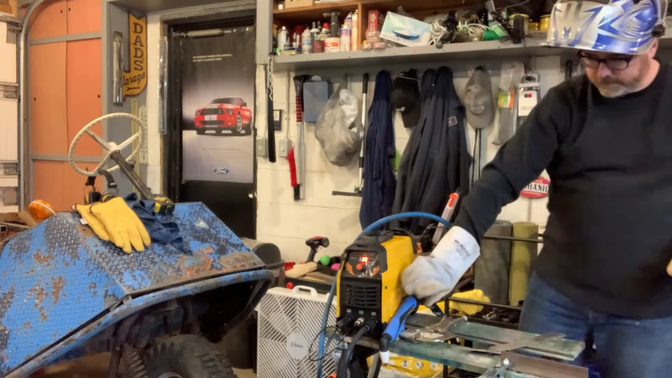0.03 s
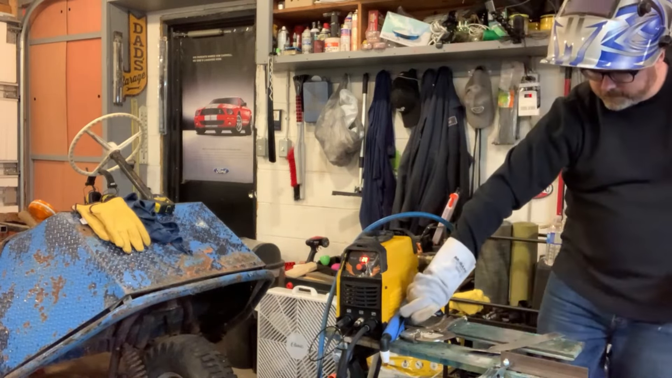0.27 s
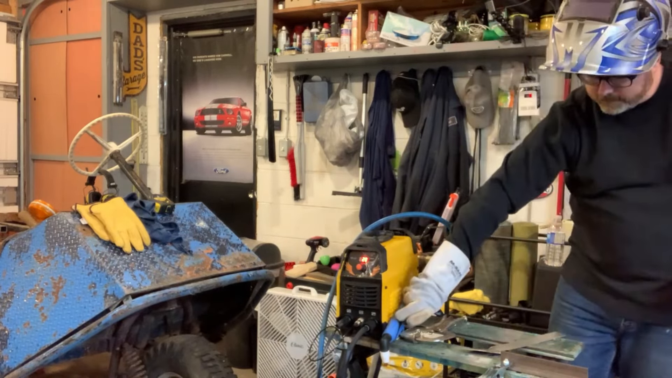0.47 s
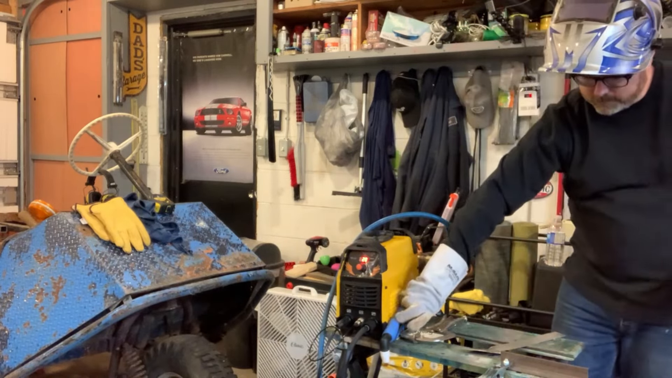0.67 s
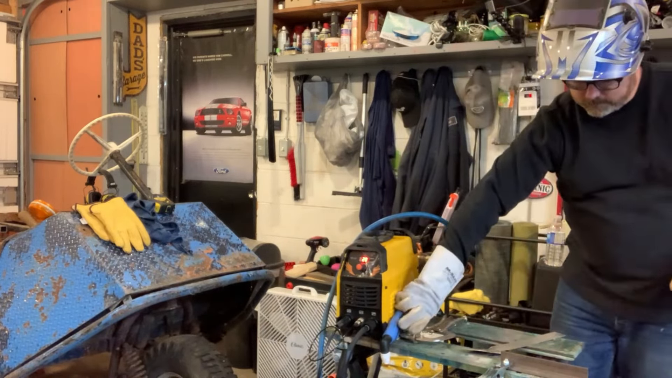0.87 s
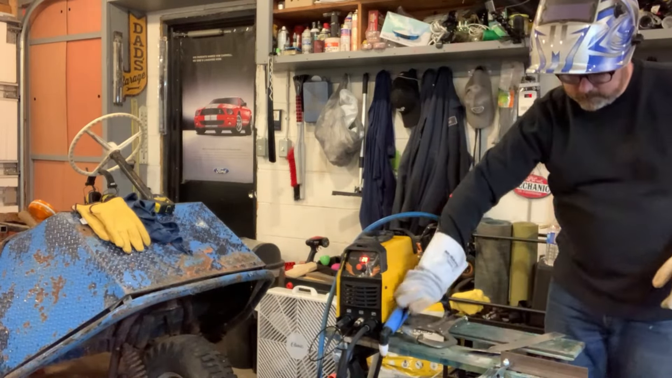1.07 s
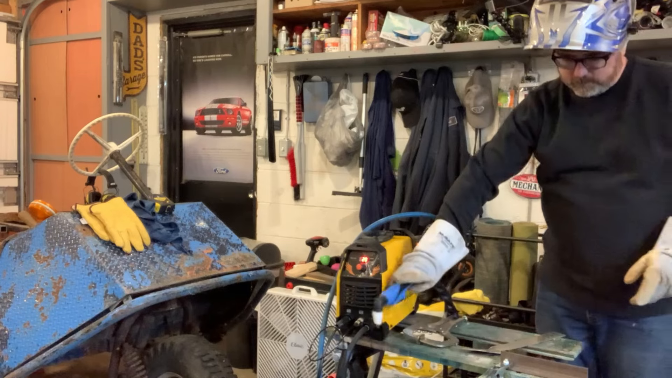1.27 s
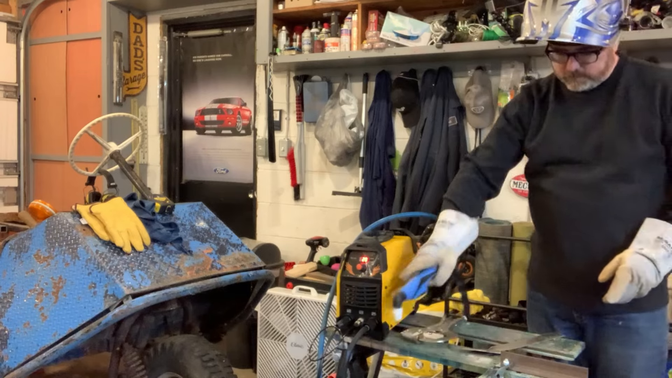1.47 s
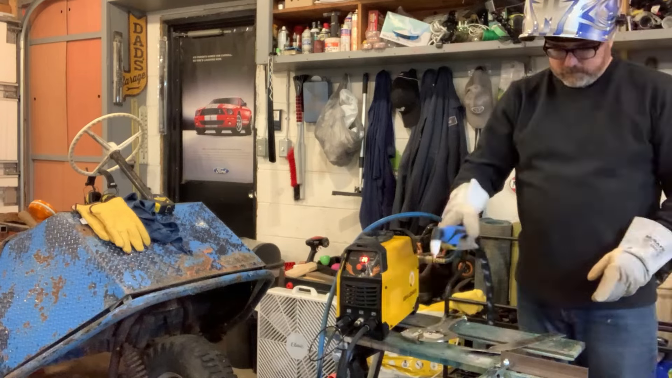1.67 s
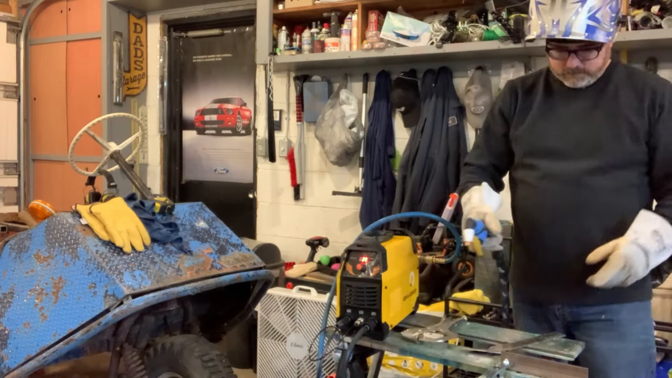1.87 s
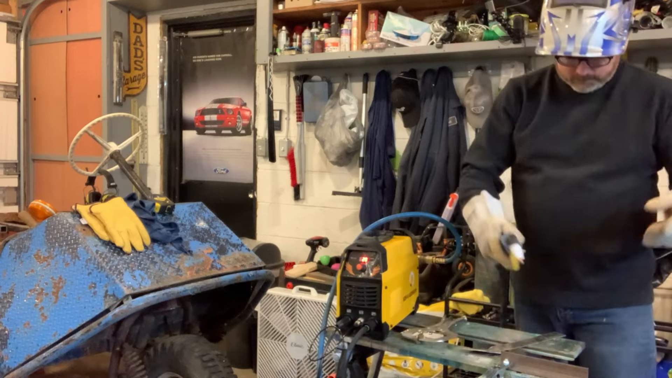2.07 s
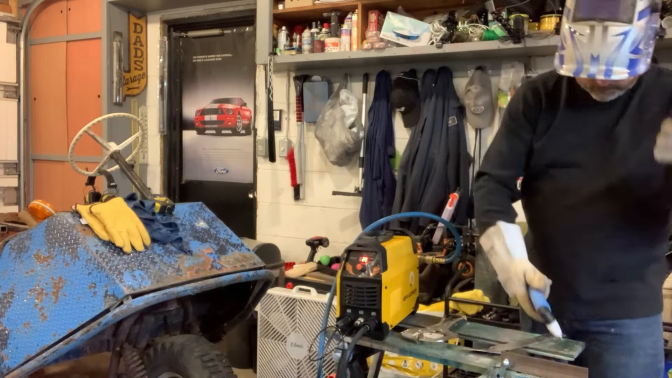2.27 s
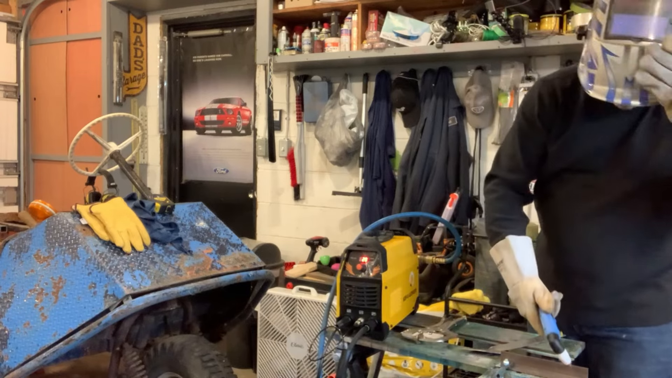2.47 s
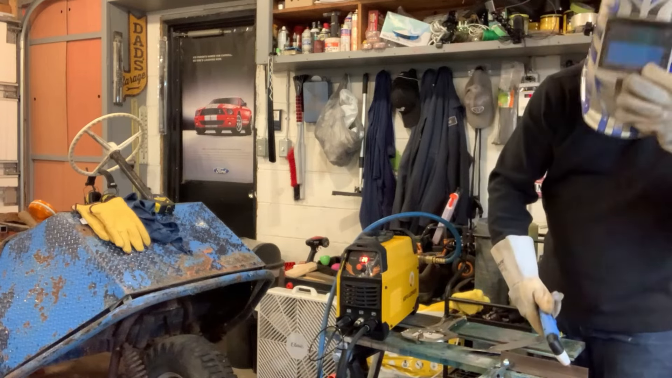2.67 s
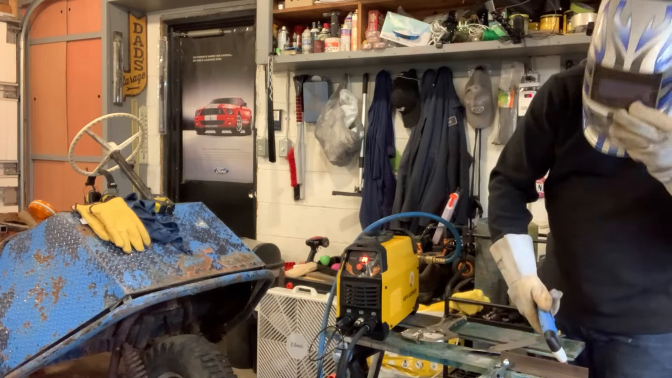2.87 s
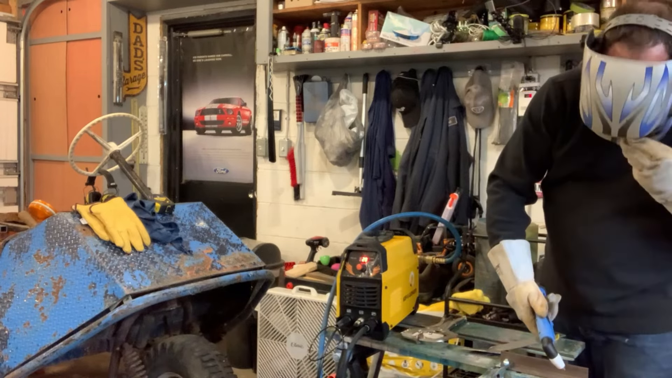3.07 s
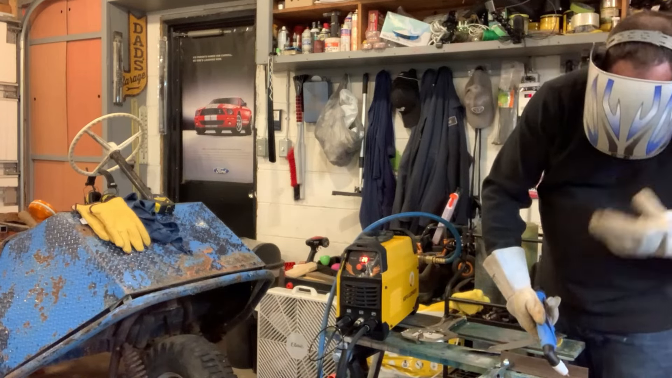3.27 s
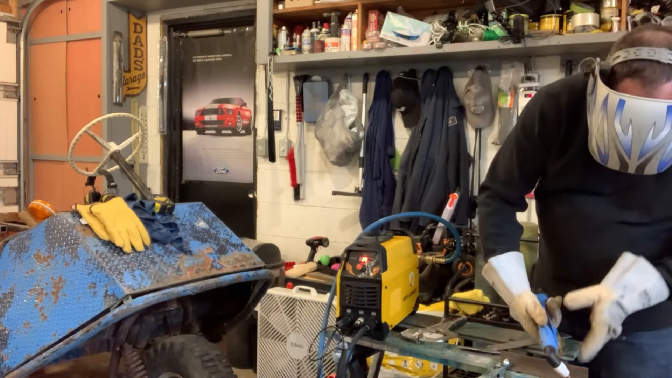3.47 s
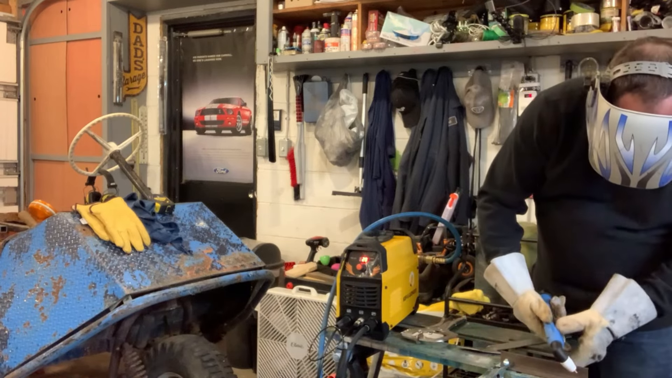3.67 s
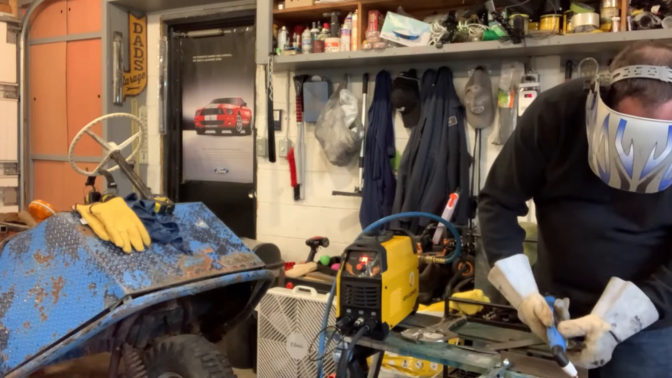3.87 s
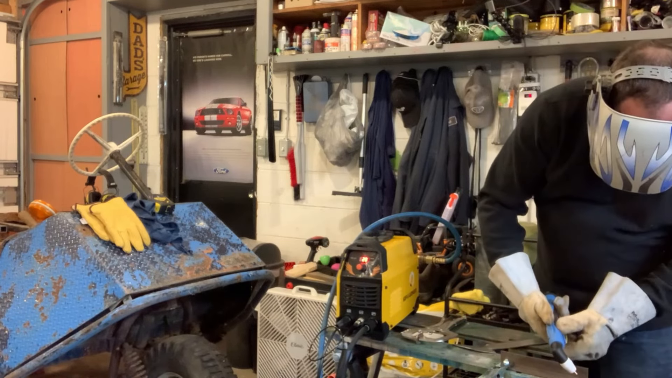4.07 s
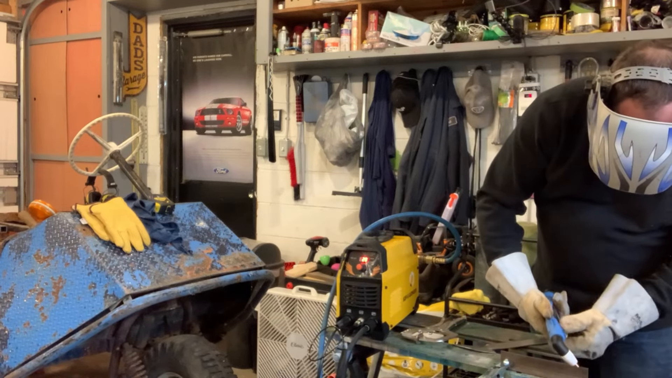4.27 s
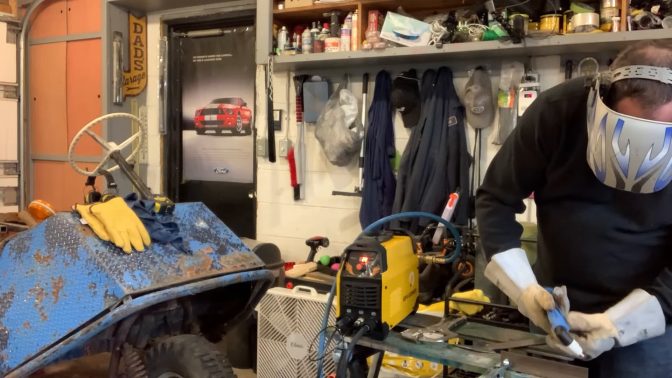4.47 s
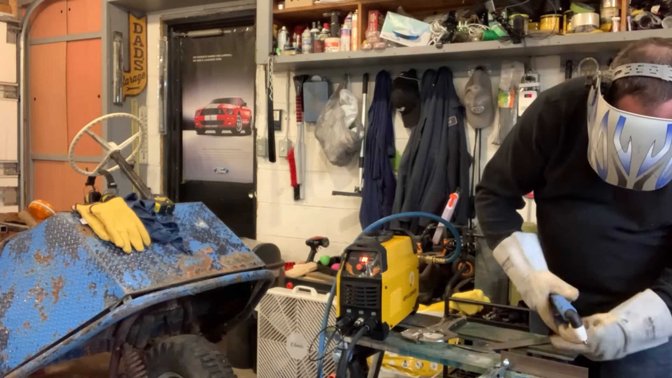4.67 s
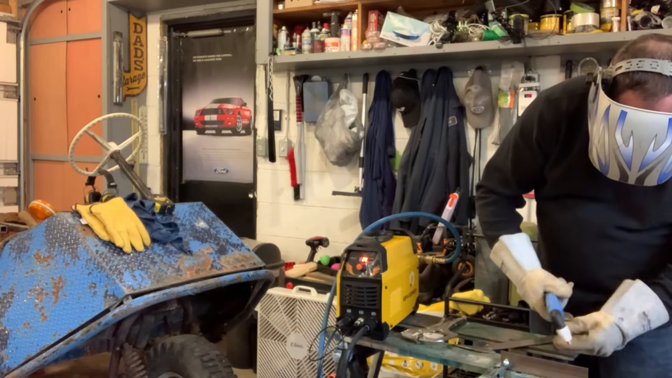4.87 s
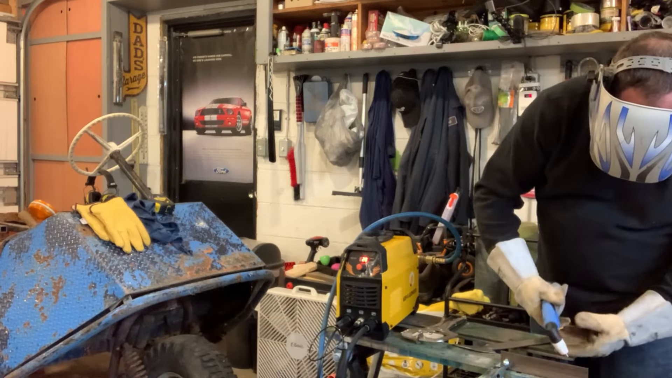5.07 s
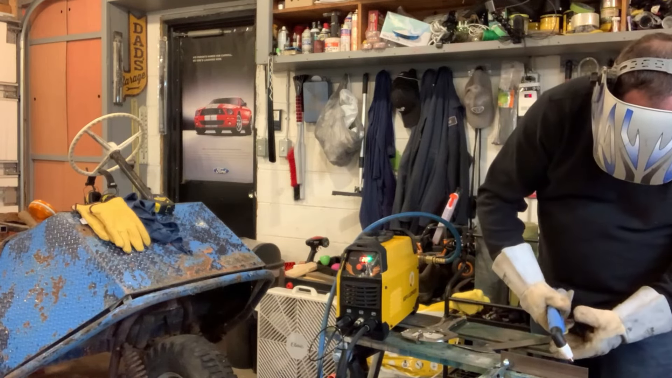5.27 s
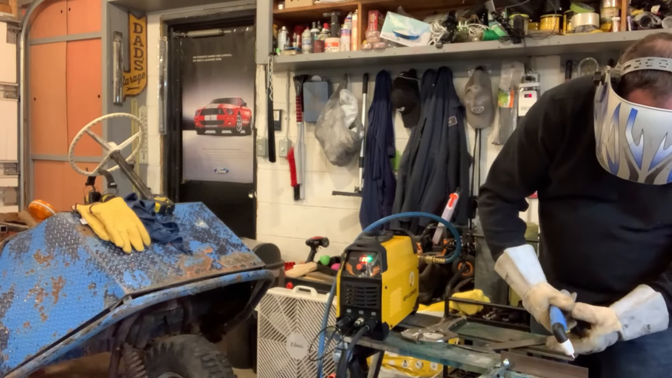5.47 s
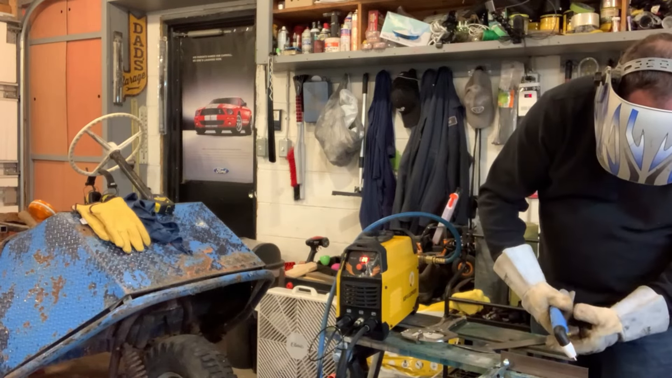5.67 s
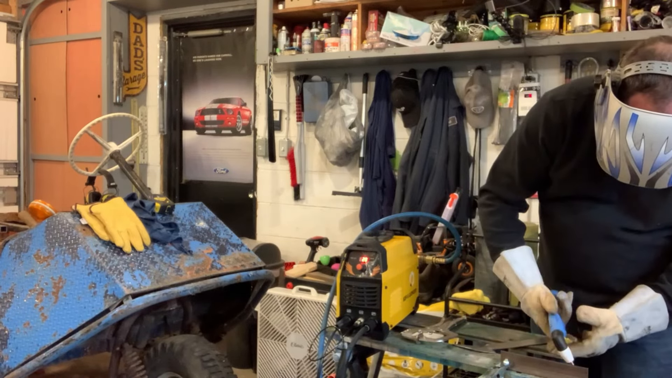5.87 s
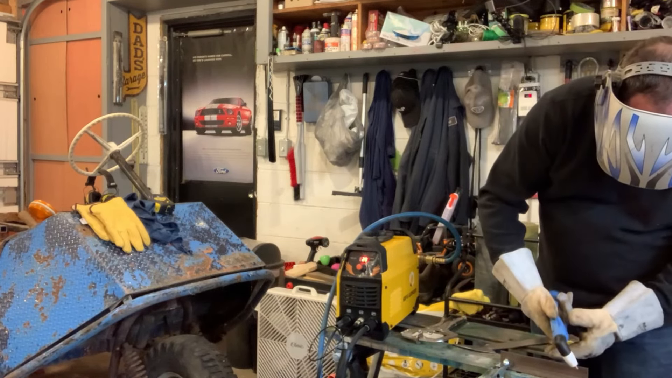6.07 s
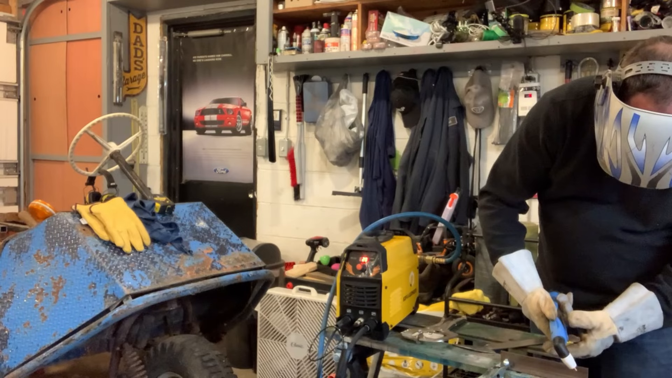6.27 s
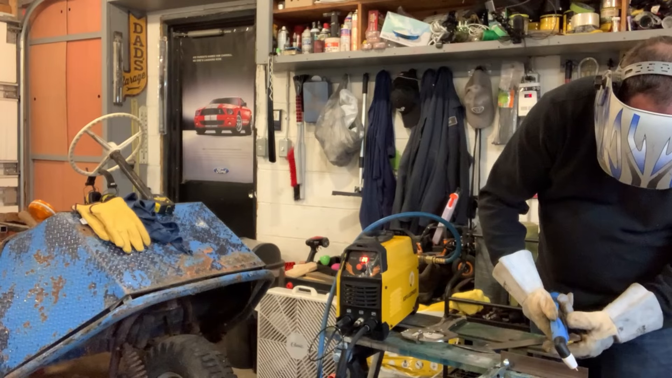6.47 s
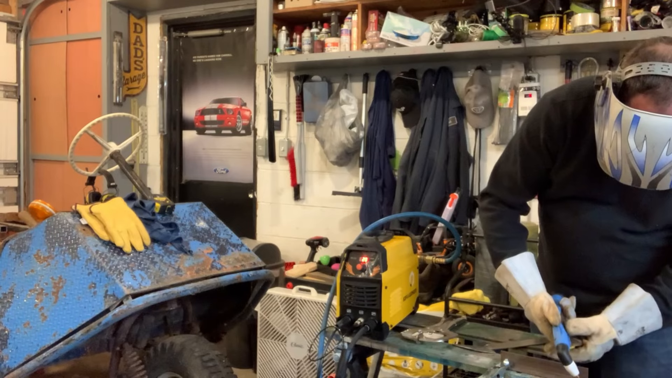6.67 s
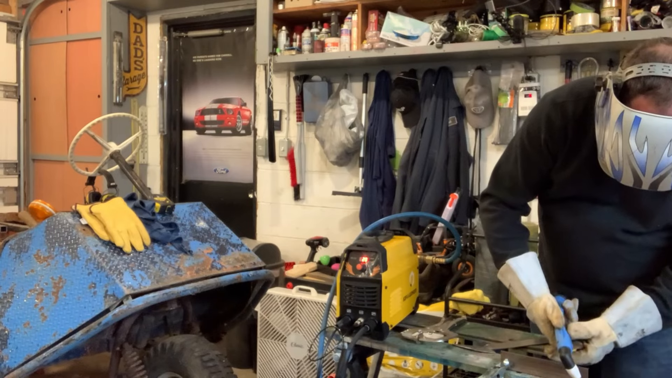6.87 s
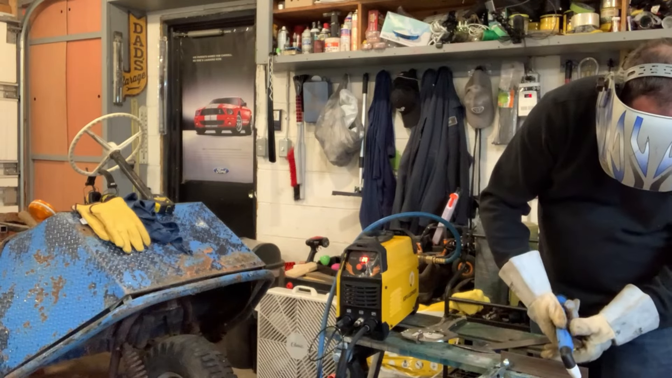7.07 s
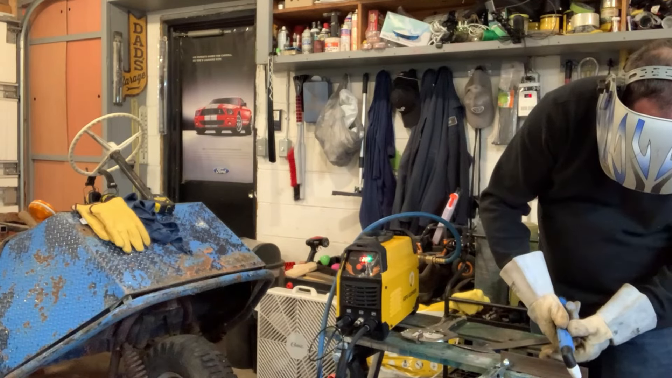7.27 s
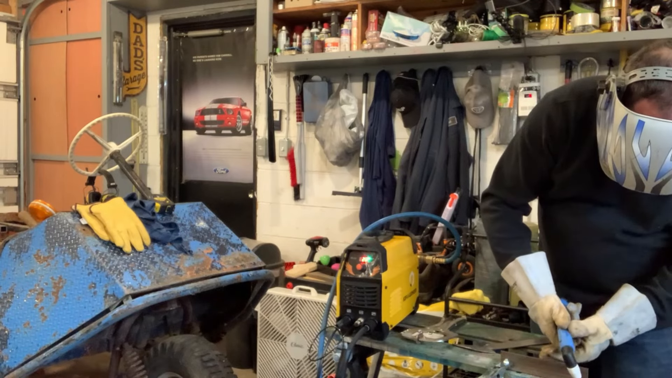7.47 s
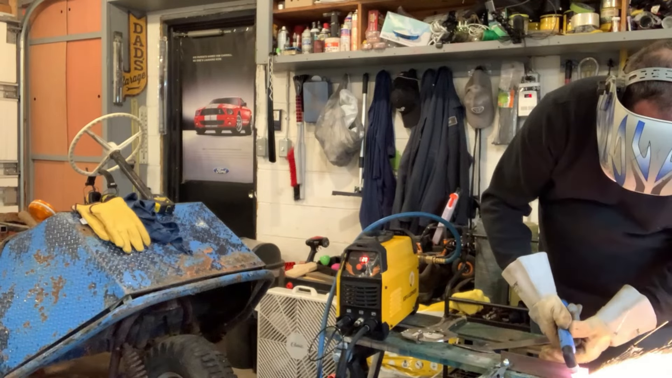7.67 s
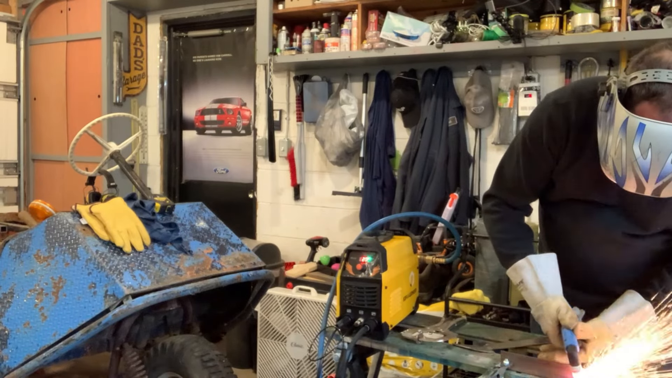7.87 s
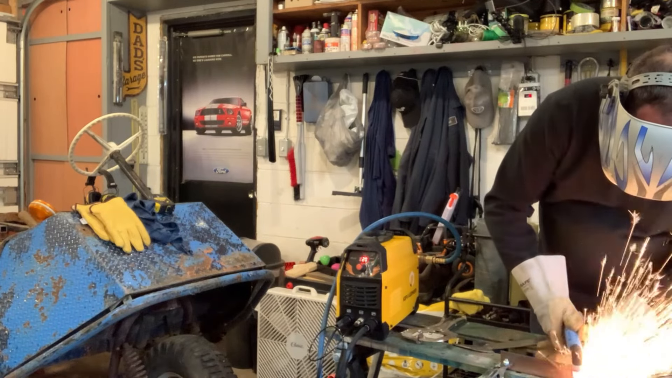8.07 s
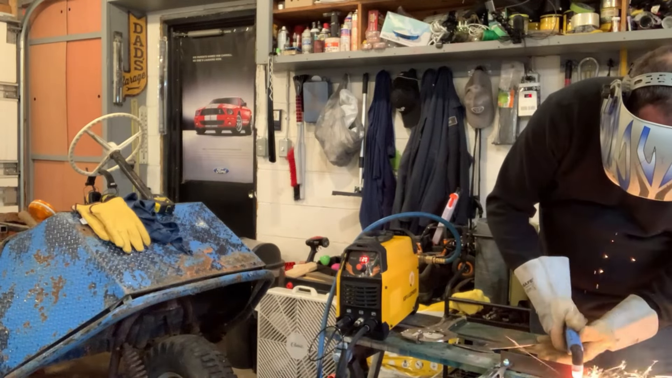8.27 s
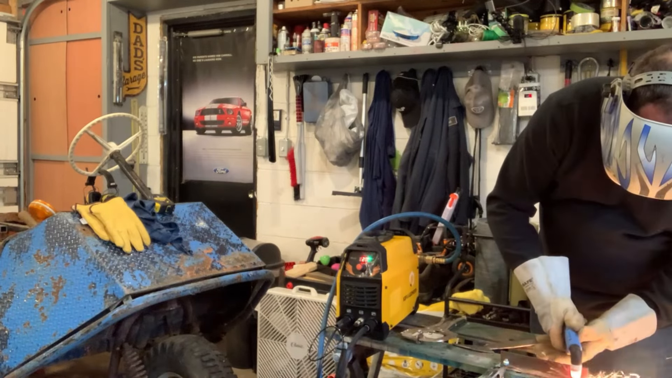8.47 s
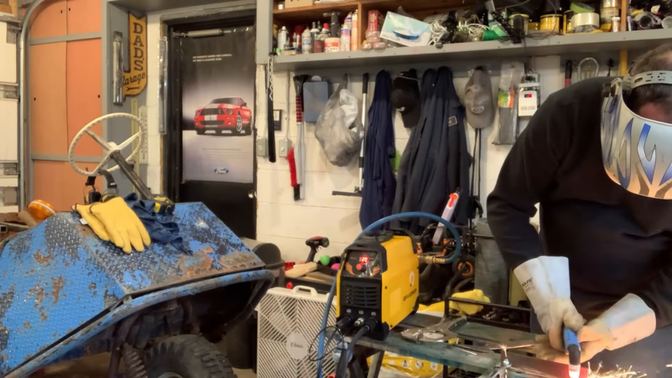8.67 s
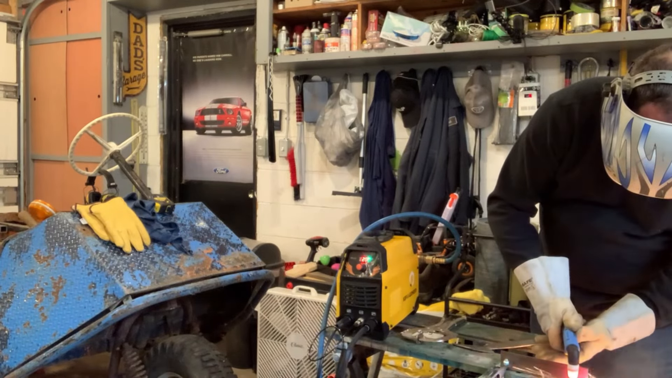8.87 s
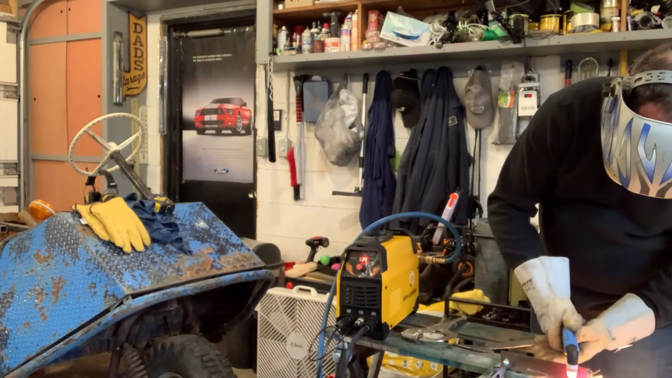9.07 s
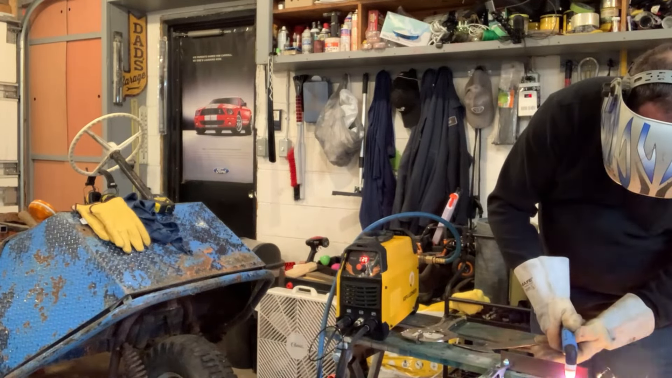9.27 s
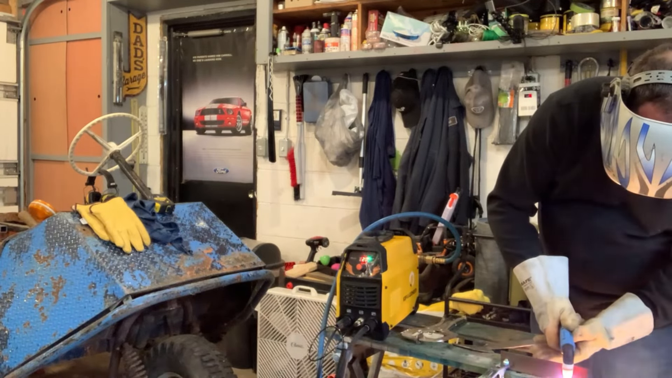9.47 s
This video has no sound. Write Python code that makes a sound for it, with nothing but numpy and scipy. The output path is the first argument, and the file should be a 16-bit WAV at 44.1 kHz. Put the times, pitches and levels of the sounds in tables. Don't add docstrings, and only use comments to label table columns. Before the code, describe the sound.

Soft knocks, glove rustle and a few sharp snaps in a garage, then a torch blasts hissing air and a harsher cutting arc.

```python
import sys
import numpy as np
from scipy import signal
from scipy.fft import rfft, irfft, next_fast_len
from scipy.io import wavfile
from scipy.ndimage import uniform_filter1d, minimum_filter1d

SR = 44100
rng = np.random.default_rng(int(sys.argv[2]) if len(sys.argv) > 2 else 0)


def rack_gain(trim_db):
    fader = np.asarray(trim_db, float)
    return 10 ** (fader / 20)


def transcribe(signal):
    frames = np.atleast_2d(signal).T
    limited = np.clip(frames, -1, 1)
    pcm = np.round(limited * 32767).astype(np.int16)
    wavfile.write(sys.argv[1], SR, pcm)


N = 419832

# t/s, nozzle hiss level/dB, how far the work blocks the jet/0-1
TRIGGER_PULLS = [
    [(5.33, -34, 0.9), (5.45, -23, 0.87), (5.63, -21, 0.98), (5.97, -21, 1), (6.58, -23, .9),
     (6.7, -23, 0.4), (7.0, -20, 0), (7.28, -22, .1), (7.45, -34, 0.5)],
    [(7.46, -37, 0.5), (7.545, -26, 0.3)],
    [(7.553, -15, .5), (7.66, -18, 0.53), (7.86, -16, 0.52), (8.04, -19.5, 0.8), (8.08, -25.5, 0.85),
     (8.4, -25, 0.8), (9.16, -24, 0.92), (9.33, -21.5, 1), (9.52, -26, 1)],
]
# roar level/dB, buffet level/dB, T60/s
VALVE_SURGES = [(-17.5, -49, 0.056), (-26, -61, 0.13), (-48, -27, 0.079)]
# t/s, length/s, lift/dB
SPLASHES = [(5.66, 0.94, 10), (8, 0.015, 4), (9.162, 0.044, 9.5), (9.421, .2, 11.5)]
# f/Hz, level/dB per Hz
HISS_SPECTRUM = [(800, -80), (3000, -11), (6000, -10), (7900, -5), (10000, 3.5), (12000, -1), (13400, -6.5),
                 (14800, -3), (15700, -20)]
# f/Hz, level/dB per Hz
ROAR_SPECTRUM = [(150, -47), (500, -19), (1000, -12), (1700, -2.5), (2600, -2.5), (3800, -1.5), (5200, -1),
                 (6800, -3), (9000, -2.5), (14000, -18)]
# f/Hz, level/dB per Hz
BUFFET_SPECTRUM = [(25, -46), (60, -18), (110, -13), (220, -9.5), (340, -5.5), (600, -8.5), (900, -4),
                   (1400, -5), (3000, -33)]
# f/Hz, width/Hz, level/quarter dB
WHISTLES = [(1420, 15, -30), (1844, 22, 20), (2320, 310, -1), (2510, 30, -10), (3180, 43, -27),
            (3810, 53, -39), (4450, 14, -3), (5800, 30, -33), (6450, 50, -42), (6850, 60, -10),
            (7600, 18, -19), (13040, 1900, -6)]
# f/Hz, width/Hz, level/dB
SHEET_MODES = [(1390, 34, 3.5), (1462, 31, 0), (1860, 16, 10), (2140, 71, -15), (2790, 120, 7),
               (3250, 63, -1), (3520, 40, 7), (3830, 41, 11.5), (4220, 24, 1), (3920, 27, -9),
               (4510, 21, -18)]
# t/s, peak level/dB, ring f/Hz, ring width/Hz
THUDS = [(0.249, -42, 310, 40), (0.281, -51, 316, 40), (0.517, -59, 317, 50), (0.821, -44.5, 300, 40.2),
         (0.915, -39.5, 234, 91), (0.946, -53, 300, 60), (1.065, -30, 290, 110), (1.489, -49, 410, 50),
         (1.709, -49, 415, 60), (1.745, -42.5, 720, 25), (1.79, -52, 734, 25), (2.6, -44, 446, 110),
         (2.659, -41.5, 510, 130), (2.739, -51, 480, 110), (2.84, -40, 432, 90), (2.9, -35.5, 476, 110),
         (2.956, -39, 455, 70), (3.029, -42.5, 427, 60), (3.329, -47, 200, 60), (3.377, -47.5, 214, 70),
         (3.721, -49, 213, 70), (3.821, -52, 230, 79), (3.89, -47.5, 204, 60.3), (3.92, -47, 364, 40),
         (5.327, -27.5, 353, 70), (5.352, -31.5, 373, 60), (5.385, -34.5, 360, 60), (7.265, -38, 338, 80),
         (7.461, -34, 355, 80)]
# t/s, peak level/dB, centre f/Hz, fall/dB per octave, treble crack level/dB
SNAPS = [(1.041, -22, 930, 5, -33), (1.137, -24.5, 3040, 4, -11.5), (3.473, -23.5, 2970, 4.5, -10),
         (4.932, -39.5, 1150, 7.5, -53), (5.1, -43.5, 2960, 7.5, -41), (5.256, -32.5, 2600, 18, -36),
         (5.328, -20.5, 2100, 17, -34)]
# t/s, peak level/dB, centre f/Hz, fall/dB per octave
KNOCKS = [(0.4, -42, 300, 9.5), (1.365, -55, 1110, 7), (1.438, -37, 525, 7), (1.636, -46.5, 1060, 6.5),
          (1.68, -36, 656, 8), (2.101, -46.5, 259, 5), (2.828, -49.5, 445, 9), (4.639, -50.5, 1290, 20),
          (7.27, -40, 590, 5), (7.46, -33.5, 2230, 11)]
# low f/Hz, high f/Hz, T60/s, lift/dB
CONTACT_BANDS = [(167, 437, 0.017, 6.5), (399, 936, 0.057, 4.5), (790, 1710, 0.013, 9.5),
                 (1620, 2170, 0.089, 0), (2600, 4400, 0.026, 7.5), (4670, 10900, 0.072, 7.5),
                 (8600, 13100, 0.012, 14)]
# t/s, length/s, level/dB, fine grains over coarse/dB
STROKES = [(0.0, 0.31, -77.5, 6), (0.378, 0.056, -78, 6), (0.607, 0.37, -87, 15.5), (0.974, 0.32, -65.5, 4),
           (1.392, 0.16, -62.5, -6), (1.631, 0.18, -61.5, 2.5), (1.886, 0.52, -83.5, 15),
           (2.543, 0.17, -60.5, -1), (2.795, 0.24, -64, 3), (3.215, 0.25, -70.5, 1), (3.43, 0.49, -71.5, 1),
           (4.17, 0.64, -89.5, 18), (4.84, 0.56, -74.5, 5)]
# t/s, peak level/dB, f/Hz
BUMPS = [(0.268, -57, 159), (0.409, -52, 159), (0.922, -62, 140), (1.458, -54, 170), (2.112, -56, 86.1),
         (2.905, -54, 81.6), (3.378, -49, 170), (5.351, -46, 75.4), (7.56, -43, 91.5), (9.197, -55, 61.9)]
# f/Hz, level/dB per Hz
FLOOR_SPECTRUM = [(25, -12.5), (65, 5.5), (110, -2), (200, -11.5), (330, -7), (600, -16.5), (1000, -8.5),
                  (2000, -17), (3300, -7), (4500, -10), (7500, 0), (9300, 9.5), (11000, -0.5), (12200, 2),
                  (14000, 0), (15800, -12)]
# f/Hz, T60/s
GARAGE_T60 = [(100, 0.22), (500, 0.31), (3000, 0.31), (8000, 0.39), (14000, 0.098)]
# f/Hz, level/dB
REVERBERANT_DB = [(100, -7), (250, 5), (500, 2.5), (1000, 6), (5000, 6.5), (9000, 4), (14000, -7.5)]
# t/s, share/0-1
FACING = [(5.3, 1), (5.8, 0.04), (5.95, 0), (6.6, 0.16), (6.8, 0.44), (7.6, 0.42), (8.3, 0.45), (8.8, .12),
          (9.3, 0.21)]
DIRECT_EDGES_HZ = [2250, 2420, 2600, 2780, 2960, 3130, 3300]
# f/Hz, likeness/0-1
LIKENESS = [(60, .7), (200, .66), (400, .42), (800, .3), (2600, .35), (3800, .12), (6500, .35), (7300, .76),
            (7800, .93), (8300, .988), (9500, .992), (10300, .93), (10800, .8), (12100, 0.4), (12800, 1.6),
            (13400, .999)]
# f/Hz, level/dB
BALANCE = [(60, -2.5), (110, 1), (200, -2.5), (380, -2), (700, -3.0), (1290, -3), (2380, -4), (4400, -4.5),
           (8120, 1.5), (15000, -2.5)]
# f/Hz, phase/rad
LEAD = [(0, 0), (350, .5), (1030, 1.3), (1720, 2.1), (2250, 3.1), (3250, 3.2), (3800, 4.3), (4500, 6),
        (5860, 4.5), (6550, 4), (7240, 3.6), (7900, 3.1), (10000, 3.1), (12750, 0.02), (13400, -0.2)]

ROAR_UNDER_HISS_DB, BUFFET_UNDER_HISS_DB, BLOCKED_LIFT_DB = -11, -36, 20.5
SPLASH_RISE_S, SPLASH_FALL_S, SHEET_UNDER_ROAR_DB = 0.099, 0.057, -5.5
AIR_START_S, ARC_START_S = 5.33, 7.555
AIR_FLUTTER, ARC_FLUTTER = 1, 1.55
STRIKE_LIFT_DB, STRIKE_FADE_S = 4.5, 0.025
THUD_T60_S, THUD_RISE_CYCLES = 0.044, 1.54
KNOCK_RISE_S, SNAP_RISE_S = 0.0083, 0.00011
FALL_CURVE = 1.12
STROKE_RISE_S, STROKE_FALL_S = 0.045, 0.12
FLOOR_DB = -50
CUTOFF_HZ = 15690


def air_jet():
    hiss_gain, roar_gain, buffet_gain = jet_levels()
    white = rng.standard_normal((2, N))
    depth = np.where(np.arange(N) > ARC_START_S * SR, ARC_FLUTTER, AIR_FLUTTER)
    gust = drift(16)
    whistling = white + sum(rack_gain(3.0 + db / 4) * resonance(white, hz, width) for hz, width, db in WHISTLES)
    hiss = coloured(whistling, HISS_SPECTRUM) * rack_gain(3.0 + depth * (0.56 * gust + 0.66 * drift(27)))
    roar = coloured(whistling, ROAR_SPECTRUM) * rack_gain(depth * (1.8 * gust + 1.06 * drift(11)))
    buffet = coloured(white, BUFFET_SPECTRUM) * rack_gain(-3 + 1.4 * drift(18))
    sheet = unit_rms(sum(rack_gain(db) * resonance(white[0], hz, width) for hz, width, db in SHEET_MODES))
    splash = np.maximum(roar_gain - hiss_gain * rack_gain(ROAR_UNDER_HISS_DB), 0)
    jet = hiss_gain * hiss + roar_gain * roar + buffet_gain * buffet
    return jet + splash * rack_gain(SHEET_UNDER_ROAR_DB) * sheet


def jet_levels():
    t, levels = np.arange(N) / SR, np.zeros((3, N))
    splash_db = sum(db * hold(s, length, SPLASH_RISE_S, SPLASH_FALL_S) for s, length, db in SPLASHES)
    for rows, (roar_db, buffet_db, t60) in zip(TRIGGER_PULLS, VALVE_SURGES):
        start_s, end_s = rows[0][0], rows[-1][0] + 0.011
        flow_db, blocked = in_time(rows)
        dying_db = -60 * np.abs(t - start_s) / t60
        hiss = rack_gain(flow_db)
        roar = rack_gain(flow_db + ROAR_UNDER_HISS_DB + splash_db) + rack_gain(roar_db + dying_db)
        buffet = rack_gain(flow_db + BUFFET_UNDER_HISS_DB + BLOCKED_LIFT_DB * blocked) + rack_gain(buffet_db + dying_db)
        levels += np.array([hiss, roar, buffet]) * ((t >= start_s) & (t < end_s))
    levels[0] *= rack_gain(STRIKE_LIFT_DB * hold(ARC_START_S, 0.015, 0.0057, STRIKE_FADE_S))
    return levels


def thuds():
    out, t = np.zeros(N + SR), np.arange(SR // 4) / SR
    for s, db, hz, width in THUDS:
        envelope = rack_gain(-60 * t / THUD_T60_S) * (1 - np.exp(-(t * hz / THUD_RISE_CYCLES) ** 2))
        rub = rng.standard_normal(len(t)) * envelope
        modes = resonance(rub, hz, width) + 0.1 * resonance(rub, 1.43 * hz, 1.3 * width)
        body = resonance(modes, 0.97 * hz, 3.4 * width)
        at = round(s * SR)
        out[at:at + len(t)] += rack_gain(db + 0.7) * body / np.abs(body).max()
    return out[:N]


def snaps():
    out, t = np.zeros(N), np.arange(4096) / SR
    for s, db, centre_hz, fall_db, *crack_db in KNOCKS + SNAPS:
        at = round((s + 0.0015) * SR)
        rise_s, first_contact = (SNAP_RISE_S, 1.1) if crack_db else (KNOCK_RISE_S, 0.3)
        peaks_db = []
        for low, high, *_ in CONTACT_BANDS:
            octaves = abs(np.log2(np.sqrt(low * high) / centre_hz))
            peaks_db.append(db - fall_db * octaves ** FALL_CURVE)
        peaks_db[-1:] = crack_db
        for (low, high, t60, lift_db), peak_db in zip(CONTACT_BANDS, peaks_db):
            envelope = rack_gain(-60 * t / max(t60, 0.003)) * (1 - np.exp(-t / rise_s))
            rattle = rng.standard_normal(len(t)) * envelope
            rattle[0] = first_contact * np.sqrt(low / 8500 * SR / (high - low))
            part = band(band(rattle, low / 1.1, high * 1.16), low / 1.58, high * 1.25)
            out[at:at + len(t)] += rack_gain(peak_db + lift_db) * part / np.abs(part).max()
    return out


def rustle():
    gains = np.zeros((2, N))
    for s, length, db, fine_db in STROKES:
        gains += rack_gain([[db], [db + fine_db]]) * hold(s, length, STROKE_RISE_S, STROKE_FALL_S)
    grains = rng.standard_normal((2, N)) * rack_gain(1.8 * drift(30))
    coarse = unit_rms(band(grains[0], 190, 690))
    fine = unit_rms(band(grains[1], 1100, 3500))
    return gains[0] * coarse + gains[1] * fine


def bumps():
    out, t = np.zeros(N + SR), np.arange(SR // 4) / SR
    for s, db, hz in BUMPS:
        lump = resonance(rng.standard_normal(len(t)) * t * np.exp(-t / 0.018), hz, 45)
        at = round(s * SR)
        out[at:at + len(t)] += rack_gain(db + 5.5) * lump / np.abs(lump).max()
    return out[:N]


def background():
    return rack_gain(FLOOR_DB + 1.6 * drift(5.9)) * coloured(rng.standard_normal((2, N)), FLOOR_SPECTRUM)


def garage(x):
    t, edges = np.arange(SR // 2) / SR, 60 * 2 ** np.arange(0, 9.1)
    response = np.zeros((2, len(t)))
    for low, high in zip(edges, np.minimum(edges[1:], 0.45 * SR)):
        hz = np.sqrt(low * high)
        envelope = rack_gain(-60 * t / at_hz(GARAGE_T60, hz)) * np.clip(t / 0.0029 - 0.4, 0, 1)
        tail = rng.standard_normal((2, len(t))) * envelope
        response += rack_gain(at_hz(REVERBERANT_DB, hz)) * band(tail / np.sqrt(np.sum(tail ** 2) / 2), low, high)
    scatter = rng.standard_normal(64) * np.exp(-np.arange(64) / 16)
    response[0, 0] = 1
    response[1, :64] += scatter / np.sqrt(np.sum(scatter ** 2))
    return signal.oaconvolve(x[None], response, axes=1)[:, :N]


def direct_path(near, other):
    size = next_fast_len(N + SR // 4)
    hz = np.arange(size // 2 + 1) * SR / size
    change = rfft(0.23 * near - other, size)
    out = other.copy()
    facing = in_time(FACING)[0] * (np.arange(N) > AIR_START_S * SR)
    for low, high in zip(DIRECT_EDGES_HZ, DIRECT_EDGES_HZ[1:]):
        share = np.clip(facing * (0.81 + 1.9 * drift(3.7)), 0, 1)
        out += share * irfft(change * ((hz >= low) & (hz < high)), size)[:N]
    return out


def unit_rms(x):
    return x / np.sqrt(np.mean(x ** 2) + 1e-20)


def in_time(rows):
    s, *columns = np.transpose(rows)
    return [np.interp(np.arange(N) / SR, s, c) for c in columns]


def at_hz(points, hz):
    table_hz, values = np.transpose(points)
    return np.interp(np.log(hz + 1), np.log(table_hz + 1), values)


def drift(rate):
    r = np.exp(-80 * np.pi * rate / SR)
    slow = signal.lfilter([1], [1, -2 * r, r * r], rng.standard_normal(N // 40 + 2002))[2000:]
    return np.interp(np.arange(N) / 40, np.arange(len(slow)), unit_rms(slow))


def hold(start_s, length_s, rise_s, fall_s):
    t = np.arange(N) / SR - start_s
    return np.clip(np.minimum(t / rise_s, 1 + (length_s - t) / fall_s), 0, 1)


def coloured(x, spectrum):
    size = next_fast_len(N)
    hz = np.arange(size // 2 + 1) * SR / size
    return unit_rms(irfft(rfft(x, size) * rack_gain(at_hz(spectrum, hz)), size)[..., :N])


def resonance(x, hz, width_hz):
    r = np.exp(-np.pi * width_hz / SR)
    poles = [1, -2 * r * np.cos(2 * np.pi * hz / SR), r * r]
    return signal.lfilter(np.array([1, 0, -1]) * (1 - r * r) / 2, poles, x)


def band(x, low_hz, high_hz):
    return signal.sosfilt(signal.butter(2, [low_hz, high_hz], "band", fs=SR, output="sos"), x)


def scene():
    floor = background()
    near, other = air_jet()
    diffuse = rack_gain(-3.5) * np.array([near, 0.083 * near + 1.12 * other])
    near, other = garage(rack_gain(-8.5) * near) + diffuse
    handling = garage(thuds() + snaps() + rack_gain(-4) * rustle())
    close_rustle = rack_gain(2.5) * np.array([rustle(), rustle()])
    jet = np.array([near, direct_path(near, other)])
    return jet + handling + close_rustle + floor + bumps()


def limited(x):
    room = minimum_filter1d(np.minimum(1, 1 / (np.abs(x).max(axis=0) + 1e-9)), size=25)
    return x * uniform_filter1d(room, size=13)


def band_limit(x):
    return signal.sosfilt(signal.butter(12, 16690, fs=SR, output="sos"), x)


def record(dry):
    size = next_fast_len(N + 4096)
    hz = np.arange(size // 2 + 1) * SR / size
    top_cut = np.clip((CUTOFF_HZ - hz) / 60 + 1, 0.0004, 1)
    near, other = rfft(dry, size) * top_cut
    alike = np.clip(at_hz(LIKENESS, hz), 0, 1)
    tilt = rack_gain(at_hz(BALANCE, hz) / 2)
    turn = np.exp(0.5j * np.interp(hz, *np.transpose(LEAD)))
    left = near * tilt / turn
    right = (alike * near + np.sqrt(1 - alike ** 2) * other) * turn / tilt
    mix = limited(irfft([left, right], size)[:, :N])
    return band_limit(mix)


dry = scene()
out = record(dry)
transcribe(out)
```